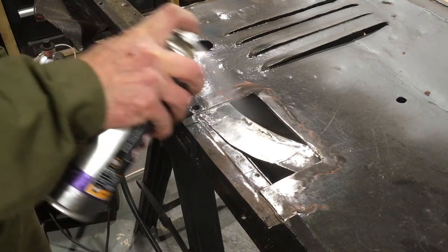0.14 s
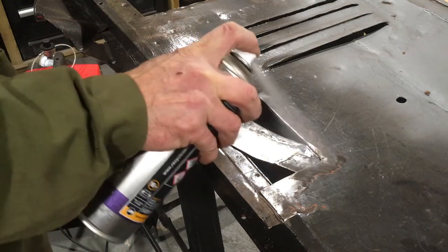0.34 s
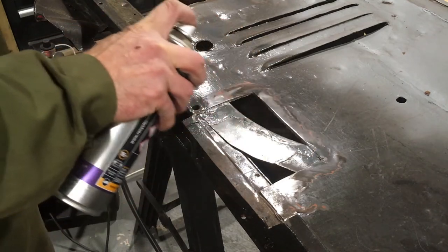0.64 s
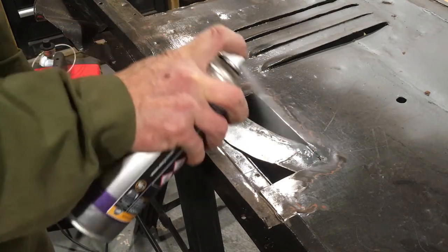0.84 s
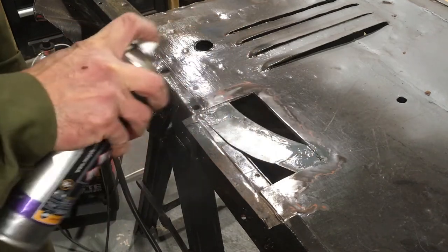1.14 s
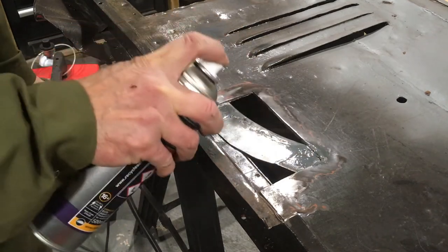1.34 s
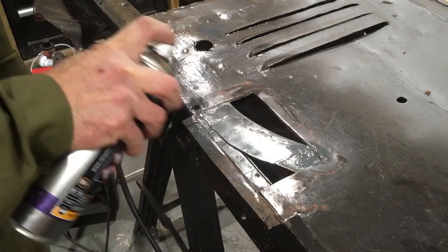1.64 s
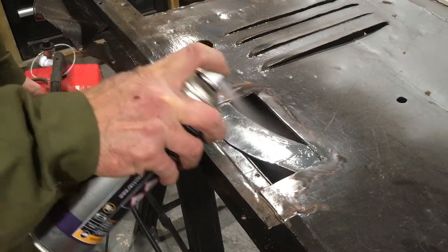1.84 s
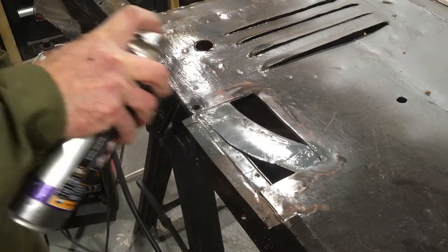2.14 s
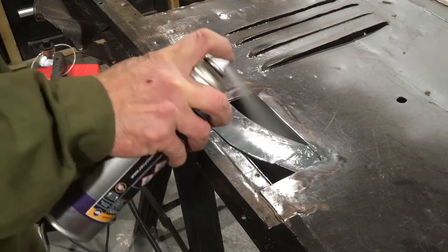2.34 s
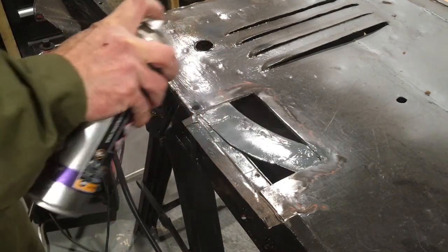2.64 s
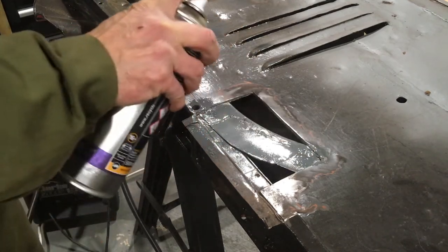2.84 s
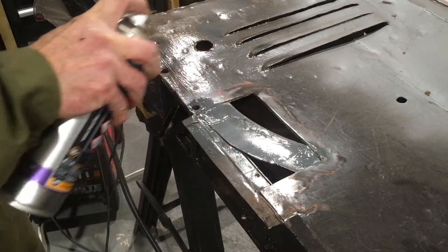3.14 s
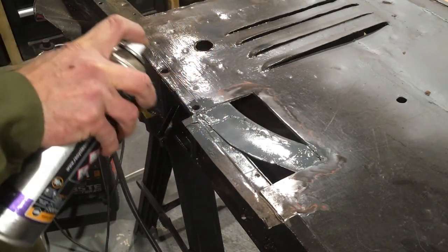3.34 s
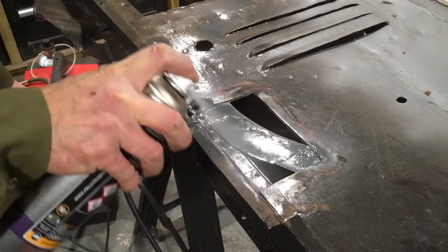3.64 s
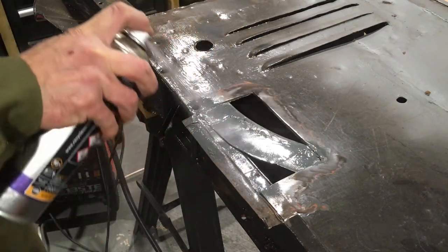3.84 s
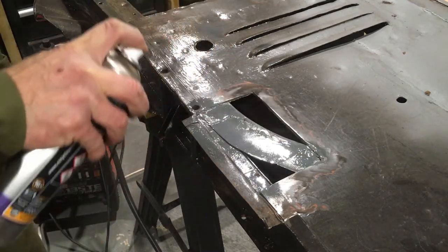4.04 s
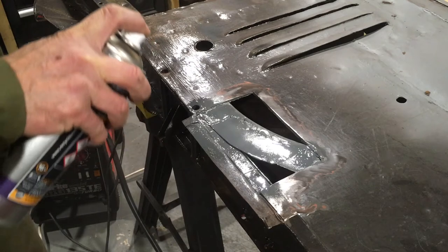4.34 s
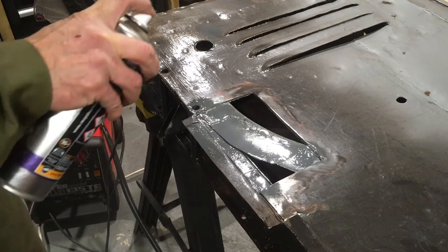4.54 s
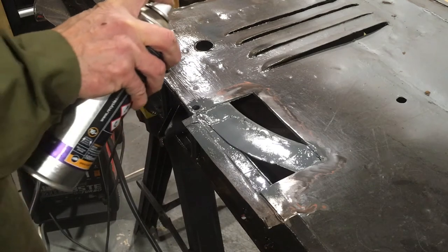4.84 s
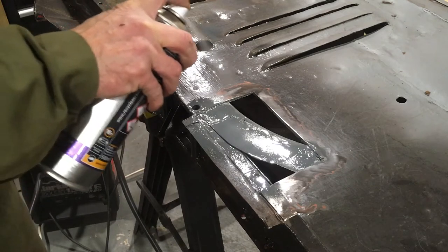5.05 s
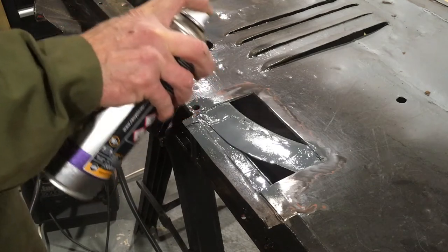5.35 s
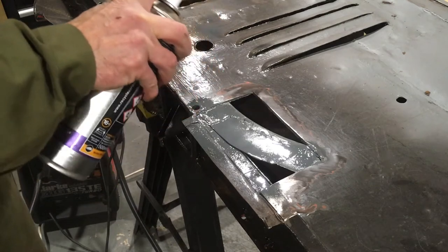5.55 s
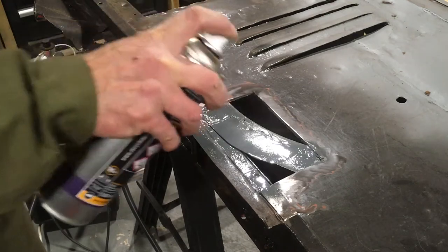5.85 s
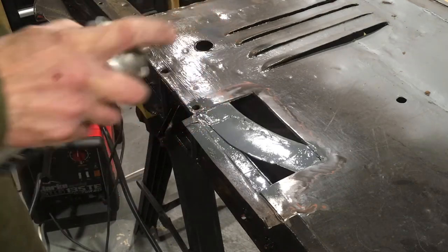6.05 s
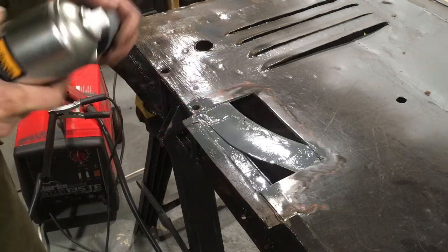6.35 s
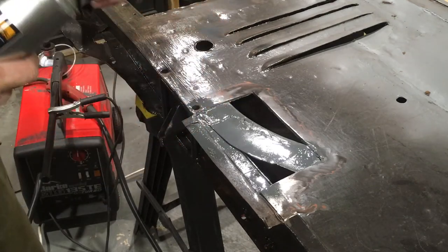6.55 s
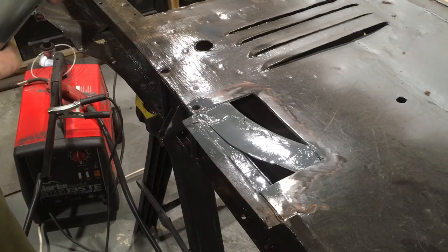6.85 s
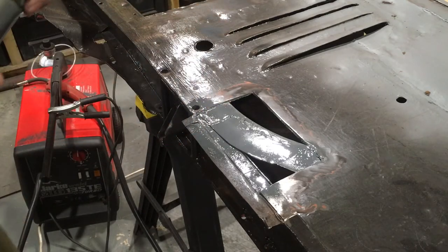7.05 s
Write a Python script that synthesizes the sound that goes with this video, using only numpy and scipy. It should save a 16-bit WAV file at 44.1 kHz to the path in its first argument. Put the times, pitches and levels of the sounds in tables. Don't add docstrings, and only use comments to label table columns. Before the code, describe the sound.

Close up in a small workshop, a spray can gives eight crisp, bright hissing bursts, some short, some about half a second, each starting and stopping abruptly. The can roars faintly and the metal sheet hums low under the blast. Tiny finger and nail ticks fill the gaps over a quiet hum. Then a hard cap snap, a rattling mixing ball and rustling cloth finish it.

```python
import sys
import numpy as np
from scipy import signal
from scipy.io import wavfile
from scipy.ndimage import uniform_filter1d

SR = 44100
rng = np.random.default_rng(int(sys.argv[2]) if len(sys.argv) > 2 else 0)


def unload_audio(sound):
    columns = np.transpose(np.atleast_2d(sound))
    steps = np.round(np.clip(columns, -1, 1) * 32767)
    wavfile.write(sys.argv[1], SR, steps.astype(np.int16))


def ratio(d):
    e = np.asarray(d, float) / 20
    return 10 ** e


N = 317243


def evened(x):
    return x / np.sqrt(np.mean(x ** 2) + 1e-20)


def read(points, hz):
    f, value = np.transpose(points)
    return np.interp(np.log(hz + 1), np.log(f + 1), value)


def add(mix, s, sound):
    part = mix[round(s * SR):][:len(sound)]
    part += sound[:len(part)]


def resonate(x, hz, width):
    turn = np.exp(2j * np.pi * np.cumsum(hz * np.ones(len(x))) / SR)
    r = np.exp(-np.pi * width / SR)
    return 2 * (turn * signal.lfilter([1 - r], [1, -r], x * turn.conj())).real


def noise(shape, patchy_db, size=512):
    hz = np.fft.rfftfreq(size, 1 / SR)
    frames = N // (size // 4) + 5
    a, b, patches = rng.standard_normal((frames, len(hz), 3)).T
    patches = uniform_filter1d(patches, size=8, axis=0)
    patches = evened(uniform_filter1d(patches, size=16, axis=1))
    z = (a + 1j * b) * ratio(read(shape, hz)[:, None] + patchy_db * patches)
    sound = signal.istft(z, nperseg=size, noverlap=size * 3 // 4)[1]
    return evened(sound[:N])


def wander(size):
    return evened(uniform_filter1d(rng.standard_normal(N), size=size))


def flutter(db, size):
    return evened(ratio(db * wander(size)))


def ring(modes, seconds):
    t = np.arange(round(seconds * SR)) / SR
    return sum(ratio(db - 60 * t / t60) * np.sin(2 * np.pi * hz * t) for hz, db, t60 in modes)


def strokes(table):
    power = np.zeros(N)
    for start, peak, end, db in table:
        u = np.interp(np.arange(start, end, 1 / SR), [start, peak, end], [0, 1, 0])
        swell = np.sin(np.pi / 2 * u) ** 1.6
        add(power, start, (ratio(db) * swell) ** 2)
    return np.sqrt(power)


def lagged(x, seconds):
    r = np.exp(-1 / (seconds * SR))
    return signal.lfilter([1 - r], [1, -r], x)


def valve():
    # start_s, end_s, flow_db, opening_time_s, finest_hiss_db (relative to flow)
    bursts = [
        (0.053, 0.501, -23, 0.0099, 1.5),
        (0.818, 1.187, -24.5, 0.014, 0),
        (1.468, 1.636, -24, 0.0098, 2.5),
        (1.883, 2.059, -23, 0.0077, 2),
        (2.371, 2.742, -24, 0.0074, 1.5),
        (3.427, 3.932, -23.5, 0.0088, 2),
        (5.083, 5.247, -23.5, .017, -1),
        (5.659, 5.792, -24, 0.013, -0.5),
    ]
    knee_s = 0.01
    gains = np.zeros((N, 3))
    for opens, closes, db, rise, aim_db in bursts:
        u = np.arange(0, closes - opens + .2, 1 / SR)
        open_db = -30.5 * np.exp(-(u / rise) ** 1.03)
        close_db = -530 * knee_s * np.logaddexp(0, (u + opens - closes) / knee_s)
        sag_db = -2.5 * (1 - np.exp(-u / 0.25))
        flow_db = db + open_db + close_db + sag_db
        roar_db = flow_db - 20.5 + .1 * open_db - .03 * close_db
        finest_db = flow_db + aim_db - .1 * open_db + .15 * close_db - 2.5 * u
        crack = np.minimum(u / 0.0015, 1)
        add(gains, opens, (crack * ratio(np.array([flow_db, roar_db, finest_db]))).T)
    return gains.T


def workshop():
    # pitch_hz, level_db (per Hz)
    hum_colour = [(18, -52), (30, -21), (43, -9.5), (59, 2), (113, -6), (135, -20.5), (152, -7), (171, -8),
                  (301, -22.5), (400, -30.5), (500, -34.5), (650, -47.5), (1100, -120)]
    # pitch_hz, level_db (per Hz)
    air_colour = [(240, -20.5), (400, -7), (1070, -8), (1440, -12), (2900, -12), (4300, -15), (4950, -18),
                  (5700, -12.5), (9000, -15), (10400, -19.5), (11500, -15), (14400, -13.5), (15600, -14.5)]
    # start_s, peak_s, end_s, level_db
    leans = [(0.2, 0.35, 0.44, -47), (1.45, 1.62, 1.91, -47.5), (1.95, 2.08, 2.35, -48.5),
             (2.38, 2.44, 2.45, -43.5), (3.95, 4.09, 4.02, -52), (4.9, 5.2, 5.6, -52),
             (6.02, 6.11, 7.1, -59), (6.25, 6.43, 6.2, -50.5), (6.9, 7.15, 6.9, -49)]
    flow = valve()[0]
    shake = np.hypot(ratio(-29) * lagged(flow, 0.07), strokes(leans))
    hum = np.hypot(ratio(-56.5), shake) * noise(hum_colour, patchy_db=1.5, size=4096)
    air = ratio(-67) * noise(air_colour, patchy_db=1.55) * flutter(db=1.5, size=3000)
    return hum + air


def room(x):
    # pitch_hz, time_to_fall_60_db_s
    decay = [(200, 0.25), (1300, 0.17), (3500, 0.28), (9000, 0.2), (15000, 0.13)]
    # delay_s, level_db
    early = [(.0011, -24.5), (.0024, -23.5), (.0062, -24), (0.0106, -32.5), (0.019, -18)]
    taps = np.zeros(SR // 2)
    at = np.arange(150, len(taps) - 12, 12)
    taps[at + rng.integers(0, 12, len(at))] = rng.choice([-1., 1.], len(at))
    hz, t, z = signal.stft(taps, SR, nperseg=128)
    fade = ratio(-60 * t / read(decay, hz)[:, None])
    tail = signal.istft(z * fade, SR, nperseg=128)[1]
    tail *= ratio(-9.5) / np.linalg.norm(tail)
    for s, db in early:
        add(tail, s, ratio(np.array([db])))
    return signal.oaconvolve(x, tail)[:N]


def creeping():
    # start_s, end_s, from_hz, to_hz, level_db
    creeps = [
        (1.238, 1.474, 2980, 2900, -68.5),
        (1.26, 1.47, 6840, 5560, -72),
        (4.498, 5.1, 9100, 8900, -75),
        (4.5, 5.1, 6100, 6200, -78),
        (5.882, 6.45, 2830, 2920, -66),
        (6.9, 6.988, 560, 330, -64),
    ]
    out = np.zeros(N)
    for start, end, from_hz, to_hz, db in creeps:
        u = np.linspace(0, 1, round((end - start) * SR))
        hz, width = from_hz + (to_hz - from_hz) * u, from_hz / 5.5
        whistle = rng.standard_normal(len(u))
        whistle = resonate(resonate(whistle, hz, width), hz, width)
        swell = np.sqrt(abs(np.sin(np.pi * u)))
        add(out, start, ratio(db) * swell * evened(whistle))
    return out


def rolling():
    # start_s, peak_s, end_s, level_db
    rolls = [(6.555, 6.59, 6.53, -51), (6.665, 6.7, 6.78, -55), (6.77, 6.82, 6.88, -61.5),
             (6.84, 6.95, 7.07, -59)]
    # pitch_hz, width_hz, level_db
    band = [(626, 200, 2), (880, 140, 2), (395, 130, -8)]
    bumps = rng.standard_normal(N) * flutter(db=3.5, size=300)
    sound = sum(ratio(db) * resonate(resonate(bumps, hz, w), hz, w) for hz, w, db in band)
    return strokes(rolls) * evened(sound)


def rustle():
    # start_s, peak_s, end_s, level_db, low_body_db (relative to level)
    slides = [(1.24, 1.3, 2, -66, -3.5), (3.313, 3.334, 3.37, -65.5, -20), (3.388, 3.422, 3.5, -64.5, -7),
              (4.33, 4.348, 4.17, -71, -25), (4.406, 4.414, 4.44, -63.5, -11), (4.522, 4.72, 8, -72.5, -22),
              (5.391, 5.415, 4.7, -71.5, -4), (5.872, 6.07, 6.2, -62, -3), (6.16, 6.2, 6.3, -54, -9),
              (6.237, 6.307, 6.54, -51, -13.5), (6.33, 6.426, 6.6, -54.5, -8),
              (6.536, 6.638, 6.66, -49.5, -16), (6.636, 6.642, 6.73, -49, -4.5),
              (6.706, 6.793, 6.9, -48.5, -21), (6.4, 6.798, 7.12, -60.5, -11.5),
              (6.95, 7.002, 7.05, -54.5, -10), (7.049, 7.063, 7.11, -51, -10),
              (7.08, 7.16, 7.31, -48.5, -9)]
    # pitch_hz, level_db (per Hz)
    cloth = [(1060, -27), (1800, -9), (1920, -7.5), (2450, -3.5), (4820, -5.5), (6610, 2), (7500, -4),
             (9070, -0.5), (10600, -6), (13600, -3), (15600, -5)]
    # pitch_hz, level_db (per Hz)
    fold = [(150, -30), (250, -2), (547, -2), (644, -1), (1260, -7), (1460, -1), (2200, -12), (2860, -53),
            (4840, -120)]
    # start_s, peak_s, end_s, level_db
    handling = [
        (7.064, 7.072, 7.095, -46.5),
        (7.138, 7.145, 7.165, -51),
    ]
    body_gain = strokes([(a, b, c, db + low_db) for a, b, c, db, low_db in slides])
    body = body_gain * noise(fold, patchy_db=2.5, size=1024)
    friction = strokes([row[:-1] for row in slides]) * noise(cloth, patchy_db=1.5)
    thud = resonate(resonate(rng.standard_normal(N), 180, 150), 200, 200)
    return flutter(db=1.0, size=150) * (friction + body) + strokes(handling) * evened(thud)


def snap():
    # start_s, peak_db
    cracks = [
        (6.1536, -0.5),
        (6.155, -22),
        (6.1558, -23),
    ]
    # pitch_hz, level_db (per Hz)
    cap_colour = [(290, -31), (500, -15.5), (1030, -10), (2160, -17.5), (3290, -21), (4400, -14),
                  (5470, -6.5), (6700, 1.5), (11300, 2), (16000, -14)]
    # pitch_hz, level_db, time_to_fall_60_db_s
    cap_ring = [(2410, -27.5, 0.0095), (4500, -23, 0.011), (6000, -22, 0.012), (9940, -20, 0.013),
                (11250, -20, 0.012)]
    out = np.zeros(N)
    colour_db = read(cap_colour, abs(np.fft.fftfreq(2048, 1 / SR)))
    log_gain = np.log(ratio(np.maximum(colour_db, -60)))
    click = np.fft.ifft(np.exp(log_gain - 1j * signal.hilbert(log_gain).imag)).real[:1000]
    crack = click / abs(click).max() + ring(cap_ring, .03)[:1000]
    for s, db in cracks:
        add(out, s, ratio(db) * crack)
    return out


def knocks():
    # start_s, peak_db, hollow_low_tone_db, sharp_edge_db
    blows = [
        (6.548, -24.5, -35, -8),
        (6.641, -48, -6, -14),
        (6.648, -32, 2, -4),
        (6.651, -32.5, 6.5, -10),
        (6.659, -30, 3, -15),
        (6.665, -38, 4, -5),
        (7.071, -48.5, 10, -12),
    ]
    # pitch_hz, level_db, time_to_fall_60_db_s
    can = [(701, -1, 0.047), (878, 4.5, 0.051), (969, -1, .075), (1580, -35, 0.023), (3480, -21, 0.07),
           (4320, -14.5, 0.022), (5900, -24, 0.043)]
    out = np.zeros(N)
    contact = signal.windows.hann(14)
    contact /= contact.sum()
    for s, db, low_db, edge_db in blows:
        body = ratio(low_db) * ring(can[:1], .2) + ring(can[1:4], .2)
        edge = ratio(edge_db + 12.5) * ring(can[4:], .2)
        add(out, s, ratio(db - 6.5) * (np.convolve(body, contact, "same") + edge))
    return out


def ticks(table, width, length):
    out, t = np.zeros(N), np.arange(1500) / SR
    puffs = rng.standard_normal((len(table), 1500))
    for (s, db, hz, edge_db), puff in zip(table, puffs):
        tick = resonate(puff * np.exp(-t / length), hz, width)
        tick = resonate(tick, hz, 2 * width)
        edge = np.diff(puff, prepend=0) * np.exp(-t / .001)
        add(out, s, ratio(db) * (tick / abs(tick).max() + ratio(edge_db) * edge / abs(edge).max()))
    return out


def finger_taps():
    # start_s, peak_db, pitch_hz, bright_edge_db
    touches = [(0.653, -50.5, 2440, -22), (2.211, -59, 2130, -20), (2.284, -59, 2140, -28.5),
               (3.1862, -63, 1950, -15), (3.324, -64, 2120, -12), (3.3907, -56.5, 1200, -12),
               (4.151, -44, 2400, -6), (4.347, -56, 2800, -4), (4.393, -56, 1340, -12),
               (4.411, -56, 2500, -12), (4.9072, -60.5, 2360, -5), (5.392, -55.5, 1110, -13),
               (5.538, -66.5, 2470, -9), (6.025, -56, 4500, -18), (4.153, -54, 4412, -12),
               (4.352, -59, 1910, -12), (4.415, -62, 1200, -12), (1.39, -58, 1200, -14),
               (6.9431, -54, 1990, -8)]
    return ticks(touches, width=500, length=0.0063)


def nail_clicks():
    # start_s, peak_db, pitch_hz, bright_edge_db
    touches = [(0.653, -50, 8500, -14), (0.748, -62, 6150, -6), (1.2994, -50, 12300, -10),
               (1.359, -53, 8500, -12), (1.382, -54, 7800, -14), (2.234, -49.5, 5540, -4.5),
               (2.2726, -48.5, 6540, -23), (2.286, -51, 11500, -16), (2.3411, -44, 11500, -6),
               (2.3415, -50, 6900, -20), (2.879, -44.5, 13400, -4), (3.322, -51, 6000, -10),
               (3.041, -52.5, 8880, -8), (4.152, -46, 5480, -13), (4.3375, -57, 12000, -8),
               (4.3694, -56, 9130, -8), (4.575, -42.5, 9150, -8), (4.5864, -51, 5900, -8),
               (6.547, -29, 4320, -1), (6.6472, -29, 11100, -5), (6.6556, -29, 6330, -6),
               (7.037, -47, 8660, -8), (7.0587, -45, 8900, -5), (7.064, -39, 9200, -8),
               (7.0715, -33, 3500, -10)]
    return ticks(touches, width=3700, length=0.0031)


def shaken_sheet(flow):
    # start_s, peak_s, end_s, level_db
    gusts = [(0.24, 0.342, 0.47, -43), (0.855, 0.884, 0.89, -40.5), (0.96, 1.044, 1.12, -42),
             (1.15, 1.17, 1.37, -56.5), (1.49, 1.525, 1.66, -42.5), (1.905, 1.931, 2.09, -42),
             (2.42, 2.508, 2.47, -38.5), (3.46, 3.56, 3.97, -47), (3.79, 3.836, 4.04, -44.5),
             (5.16, 5.24, 4.1, -46), (5.69, 5.718, 5.93, -49.5)]
    # pitch_hz, width_hz, level_db
    tones = [(145.6, 8.4, 1), (184.3, 38, 3.5), (225, 44, -2.5), (289, 25, -15.5)]
    drum = np.hypot(ratio(-28) * lagged(flow, 0.031), strokes(gusts))
    blast = rng.standard_normal(N) * drum
    sheet = sum(ratio(db) * resonate(resonate(blast, hz, w), hz, 3 * w) for hz, w, db in tones)
    return sheet * np.linalg.norm(drum) / np.linalg.norm(sheet)


def can_roar():
    # pitch_hz, level_db (per Hz)
    roar_colour = [(210, -14), (350, -8.5), (391, -11.5), (437, -9.5), (1230, -7), (1540, -10),
                   (2400, -0.5), (2770, -10), (3910, -6), (5000, -8.5), (6500, -39), (11000, -120)]
    can = noise(roar_colour, patchy_db=0.64, size=1024)
    drift = 1 + 0.0089 * wander(3000)
    cavity = resonate(resonate(can, 2390 * drift, 260), 2350 * drift, 440)
    return evened(can + ratio(-3.5) * cavity)


def spray():
    # pitch_hz, level_db (per Hz)
    jet_colour = [(1760, -60), (3000, -19), (3930, -16.5), (5030, -14), (5860, -6), (6910, -5),
                  (7720, -6.5), (9050, -1), (10300, -2), (11900, 2.5), (13400, -1), (15100, 0),
                  (15700, 0.5)]
    # pitch_hz, width_hz, level_db (relative to the jet)
    nozzle = [(5955, 130, -8.5), (6800, 760, -7), (9560, 900, -5.5), (12000, 1350, -4.5)]
    flow, roar, aim = valve()
    jet = noise(jet_colour, patchy_db=1.25)
    jet = evened(jet + sum(ratio(db) * resonate(jet, hz, width) for hz, width, db in nozzle))
    top = signal.oaconvolve(jet, signal.firwin(63, 13400, pass_zero=False, fs=SR), "same")
    hiss = flow * (jet - top) + aim * evened(top)
    droplets = rng.random(N) < 70 / SR
    spits = 1 + 1.45 * np.convolve(droplets, signal.windows.hann(16), "same")
    sputter = spits * flutter(db=-0.05, size=90) * flutter(db=0.83, size=1200)
    return sputter * (hiss + roar * can_roar()) + ratio(-0.5) * shaken_sheet(flow)


def scene():
    near = spray() + finger_taps() + nail_clicks() + knocks() + snap()
    hands = rustle() + rolling() + creeping()
    mono = near + room(near) + hands + workshop()
    return np.array([mono, mono])


def low_pass(x):
    return signal.sosfilt(signal.butter(12, 17060, fs=SR, output="sos"), x)


def record(dry):
    edge = signal.firwin(1201, 15730, window=("kaiser", 9), fs=SR)
    mix = signal.oaconvolve(dry, edge[None], "same")
    return low_pass(mix)


dry = scene()
out = record(dry)
unload_audio(out)
```